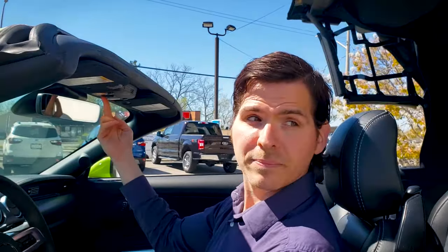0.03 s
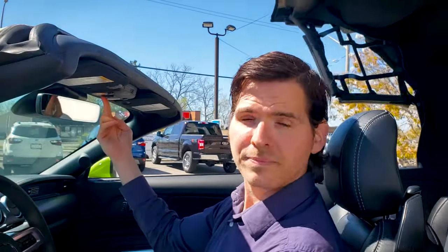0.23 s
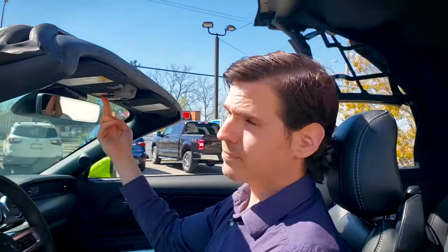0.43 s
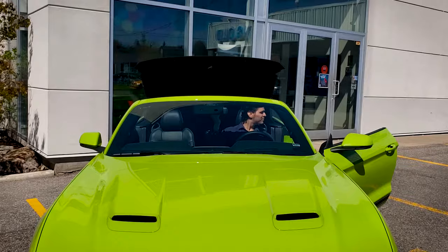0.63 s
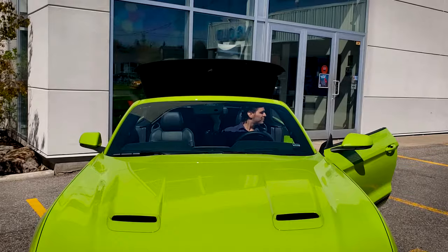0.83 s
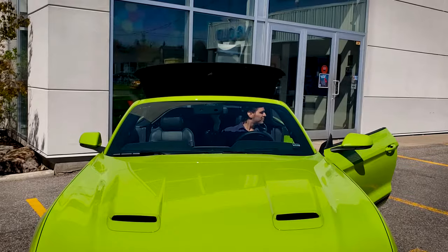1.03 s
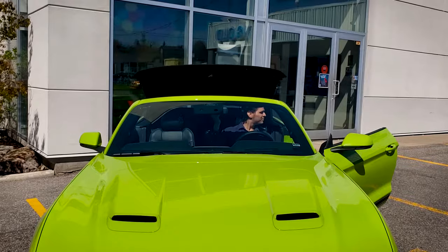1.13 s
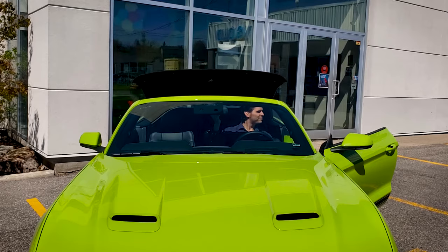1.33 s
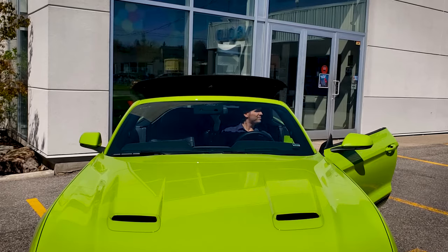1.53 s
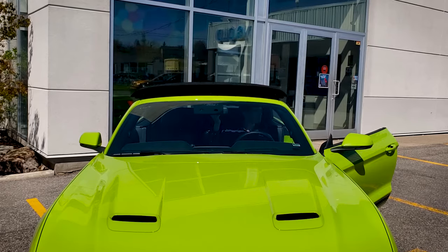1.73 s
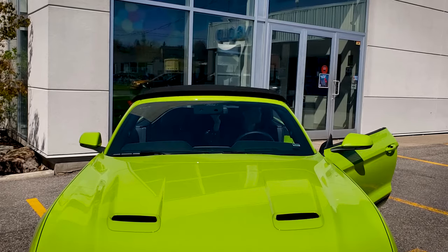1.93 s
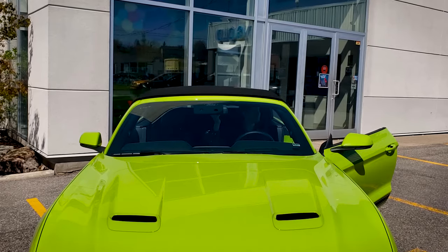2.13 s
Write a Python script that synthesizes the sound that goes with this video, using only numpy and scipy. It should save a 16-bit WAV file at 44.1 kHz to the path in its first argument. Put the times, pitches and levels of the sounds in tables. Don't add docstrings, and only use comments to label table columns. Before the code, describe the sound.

Steady low hum of an idling car, soft-top motor whirring underneath, wind thumping the microphone midway

```python
import sys
import numpy as np
from scipy import signal
from scipy.fft import rfft, irfft
from scipy.io import wavfile
from scipy.ndimage import uniform_filter1d

SR = 44100
rng = np.random.default_rng(int(sys.argv[2]) if len(sys.argv) > 2 else 0)


def makeup_ratio(level_db):
    decades = np.asarray(level_db, float) / 20
    return 10 ** decades


def wrap_up_sound(samples):
    columns = np.atleast_2d(samples).T
    tamed = np.clip(columns, -1, 1)
    steps = np.round(tamed * 32767).astype(np.int16)
    wavfile.write(sys.argv[1], SR, steps)


N = 96402
TIME_S = np.arange(N) / SR
HZ = np.fft.rfftfreq(N, 1 / SR)


def level(x, db):
    return x * makeup_ratio(db) / np.sqrt(np.mean(x ** 2))


def over_hz(table, hz):
    f, db = np.array(table, float).T
    return np.interp(np.log(np.maximum(hz, 1)), np.log(f), db)


def over_time(table):
    s, value = np.array(table, float).T
    return np.interp(TIME_S, s, value)


def noise():
    return rng.standard_normal(N)


def colour(x, gain):
    return irfft(rfft(x) * gain, N)


def ring(hz, width_hz):
    return 1 / (1 + 1j * (HZ - hz ** 2 / np.maximum(HZ, 1)) / width_hz)


def above(hz, steepness):
    return 1 / (1 + (hz / np.maximum(HZ, 1)) ** steepness)


def causal(db):
    cepstrum = irfft(db * np.log(10) / 20, N)
    cepstrum[1:N // 2] *= 2
    cepstrum[N // 2 + 1:] = 0
    return np.exp(rfft(cepstrum))


def walk(rate_hz):
    wander = colour(noise(), np.exp(-(HZ / rate_hz) ** 2))
    return wander / wander.std()


# time_s, firings_hz
FIRING = [
    (0, 41.3),
    (.25, 41.55),
    (.97, 41.6),
    (1.1, 41.15),
    (2.19, 41.2),
]


def engine_turns():
    return 0.167 + np.cumsum(over_time(FIRING)) / SR


def strikes(turns, at, cyl_db, scatter_db, jitter_s):
    k = np.arange(-1, int(turns[-1]) + 1)
    time_luck, size_luck = rng.standard_normal((len(k), 2)).T
    where = np.interp(k + at, turns, np.arange(N), -9, -9) + jitter_s * SR * time_luck
    size = makeup_ratio(np.array(cyl_db)[k % len(cyl_db)] + scatter_db * size_luck)
    size = size * (where > 0) * (where < N - 2)
    i = np.clip(where.astype(int), 0, N - 2)
    out = np.zeros(N)
    np.add.at(out, i, size * (1 - where + i))
    np.add.at(out, i + 1, size * (where - i))
    return out


# multiple_of_firing_rate, level_db
EXHAUST_OVERTONES = [(1, -7), (2, -9), (3, 1.5), (4, -22), (5, -28.5), (6, -19.5), (7, -24.5), (8, -18.5),
                     (9, -14.5), (10, -26), (11, -36), (12, -58), (13, -35.5), (14, -35.5)]


def exhaust(turns):
    multiple, db = np.array(EXHAUST_OVERTONES, float).T
    firing_hz = np.mean(np.array(FIRING)[:, 1])
    pipe_hz = np.r_[0, firing_hz / 2, multiple * firing_hz, 620, 690, SR / 2]
    pipe = causal(np.interp(HZ, pipe_hz, np.r_[-50, -30, db, -37, -60, -120]))
    chamber = 1 - 2 * ring(358, 100)
    tailpipe = 1 - 2 * ring(60, 19)
    body = 1 + makeup_ratio(1) * ring(540, 25)
    pipe = -pipe * chamber * tailpipe * body
    upper = above(270, 10)
    scatter_db, jitter_s = 0.25, 0.00008
    even = colour(strikes(turns, 0, [0], scatter_db, jitter_s), pipe * (1 - upper))
    cylinders = strikes(turns, 0, [-4, 3.5, -0.5, 0.5], 1.0, jitter_s)
    uneven = colour(cylinders, pipe * upper)
    return level(even + uneven, -22)


# pitch_hz, level_db (per Hz)
RUSH = [(30, -30), (100, -23), (400, -11), (600, -14.5), (1400, -18), (2400, -27), (6300, -41.5),
        (16000, -42)]


def rush(turns):
    shared = 0.36 / (1 + (HZ / 1670) ** 2)
    common = noise()
    beat = makeup_ratio(2.2 * np.cos(2 * np.pi * (turns - 0.05)))
    treble = above(2000, 2)
    tone = makeup_ratio(over_hz(RUSH, HZ))
    ports = []
    for _ in range(2):
        air = colour(common, tone * np.sqrt(shared)) + colour(noise(), tone * np.sqrt(1 - shared))
        ports.append(colour(air, 1 - treble) + beat * colour(air, treble))
    return level(np.array(ports), -46)


def ticks(turns, rings, at, cyl_db, length_s, rub_db, db):
    taps = strikes(turns, at, cyl_db, 0.5, 0.00036)
    fade = 1 / (1 + 2j * np.pi * HZ * length_s)
    scrape = colour(taps, fade) * length_s * SR * noise()
    metal = sum(makeup_ratio(gain_db) * ring(hz, width_hz) ** 2 for hz, width_hz, gain_db in rings)
    ports = [colour(scrape + makeup_ratio(rub_db) * noise(), metal) for _ in range(2)]
    return level(np.array(ports), db)


# pitch_hz, width_hz, level_db
VALVE_RINGS = [(3065, 74, 1), (3265, 400, -0.5), (4002, 390, 3), (4390, 350, 0), (5230, 120, -2),
               (11640, 760, -12)]


def valves(turns):
    return ticks(turns, VALVE_RINGS, at=0.82, cyl_db=[-9, -1.5, -7, -3],
                 length_s=0.0073, rub_db=-6.5, db=-59)


# pitch_hz, width_hz, level_db
INJECTOR_RINGS = [(7670, 250, -5), (8000, 180, -3), (8560, 85, -9)]


def injectors(turns):
    return ticks(turns, INJECTOR_RINGS, at=0.12, cyl_db=[-4.5, -1, -0.5, -7],
                 length_s=0.0027, rub_db=-12.5, db=-66)


# pitch_hz, width_hz, level_db
GEARS = [(780, 25, -64), (1190, 12, -70), (1735, 25, -73), (1908, 30, -71), (2056, 30, -70),
         (2557, 28, -73)]
# time_s, load_db
ROOF_LOAD = [
    (0, 4),
    (.45, 2.5),
    (.8, 2),
    (1.6, 1),
    (2.19, 4),
]


def roof_motor():
    whir = sum(level(colour(noise(), ring(hz, width_hz) ** 2), db) for hz, width_hz, db in GEARS)
    brushes = level(colour(noise(), ring(955, 430)), -55)
    return (whir + brushes) * makeup_ratio(over_time(ROOF_LOAD))


# time_s, level_db
GUSTS_LEFT = [(0, -78), (.6, -38), (.72, -53), (.8, -43), (.93, -31), (1.0, -23), (1.07, -47), (1.13, -20),
              (1.2, -32.5), (1.27, -20), (1.35, -31.5), (1.43, -19.5), (1.55, -35.5), (1.7, -32.5),
              (1.85, -34), (2.0, -40), (2.19, -64)]
# time_s, level_db
GUSTS_RIGHT = [(0, -28), (.55, -42.5), (.78, -33), (.9, -30.5), (.96, -17.5), (1.04, -46), (1.11, -17.5),
               (1.18, -45), (1.25, -19), (1.33, -32), (1.47, -36), (1.62, -19), (1.72, -22.5), (1.77, -40),
               (1.87, -19.5), (1.95, -28.5), (2.05, -29), (2.19, -32)]
# pitch_hz, level_db (per Hz)
WIND_TONE = [(20, -22), (45, -7), (72, 0), (110, -3), (170, -9), (300, -22), (600, -44), (16000, -100)]


def wind(gusts):
    rumble = colour(noise(), makeup_ratio(over_hz(WIND_TONE, HZ)))
    even = int(0.025 * SR)
    swell = np.sqrt(uniform_filter1d(uniform_filter1d(rumble ** 2, even), even))
    rumble = level(rumble / swell ** 0.85, 0)
    flutter_db = 1.0 * walk(37.5)
    return rumble * makeup_ratio(over_time(gusts) + flutter_db)


# time_s, peak_db, pitch_hz, sharp_edge (0-1)
POPS_LEFT = [(0.982, -27, 160, 0.1), (1.152, -29, 170, 0.1), (1.251, -15, 280, 0.1), (1.279, -31, 119, 0),
             (1.421, -16, 296, 0.4), (1.44, -11.5, 90.5, .1), (1.52, -30, 170, .1), (1.61, -17, 209, 0.06)]
# time_s, peak_db, pitch_hz, sharp_edge (0-1)
POPS_RIGHT = [(.944, -7, 191, 0.58), (1.103, -21, 200, 0.26), (1.25, -19, 250, .1), (1.553, -42, 220, .1),
              (1.607, -23, 160, .1), (1.655, -18, 290, 0.17), (1.669, -16, 131, 0.089),
              (1.69, -20, 326, 0.53), (1.847, -11, 224, 0.47), (1.89, -33, 200, .1),
              (1.956, -23, 263, 0.36)]


def eddies(pops):
    out = np.zeros(N)
    for s, db, hz, edge in pops:
        u = (np.pi * hz * (TIME_S - s)) ** 2
        sharp = (1 - 3 * u) / (1 + u) ** 3
        smooth = (1 - 2 * u) * np.exp(-u)
        out += makeup_ratio(db) * (edge * sharp + (1 - edge) * smooth)
    return out


# time_s, peak_db, length_s
FRAME_CLICKS = [
    (1.073, -46, 0.00091),
    (1.079, -46, 0.0012),
    (1.085, -47, .001),
    (2.1465, -34.5, 0.00066),
    (2.151, -45, .001),
]


def frame_clicks():
    clicks = np.zeros(N)
    for s, db, length_s in FRAME_CLICKS:
        clicks += makeup_ratio(db) * (TIME_S > s) * np.exp(-np.maximum(TIME_S - s, 0) / length_s)
    return clicks * colour(noise(), ring(5700, 14000))


# pitch_hz, difference_db
PORT_BALANCE = [(60, -0.2), (200, 2), (310, -1.5), (400, 2), (2400, 2.5), (4400, 3.5), (8000, 7.5),
                (15000, 8.5)]


def at_ports(car):
    drift = np.linspace(car[:, 0], car[:, -1], N).T
    car = car - drift
    tilt_db = over_hz(PORT_BALANCE, HZ) / 2
    late = np.exp(-2j * np.pi * HZ * 0.00033)
    panel_echo = 1 - 2 * ring(556, 20)
    left = colour(car[0], makeup_ratio(tilt_db) * late * panel_echo)
    right = colour(car[1], makeup_ratio(-tilt_db))
    return drift + np.array([left, right])


def scene():
    turns = engine_turns()
    engine = exhaust(turns) + rush(turns) + valves(turns) + injectors(turns)
    car = engine + roof_motor() + frame_clicks()
    wind_left = wind(GUSTS_LEFT) + eddies(POPS_LEFT)
    wind_right = wind(GUSTS_RIGHT) + eddies(POPS_RIGHT)
    return at_ports(car) + np.array([wind_left, wind_right])


def roll_off(x):
    return signal.sosfilt(signal.butter(12, 16570, fs=SR, output="sos"), x)


def record(dry):
    low_pass = signal.ellip(8, 0.1, 40, 15900, fs=SR, output="sos")
    cut = signal.sosfiltfilt(low_pass, dry)
    mix = cut * np.sin(np.pi / 2 * np.minimum(TIME_S / 0.0015, 1))
    return roll_off(mix)


dry = scene()
out = record(dry)
wrap_up_sound(out)
```